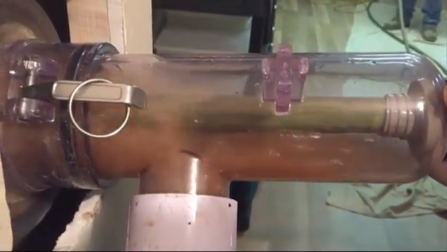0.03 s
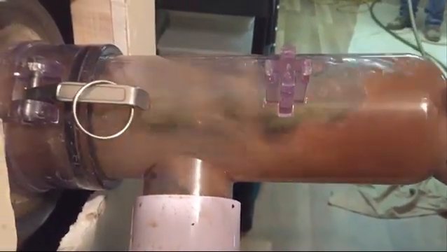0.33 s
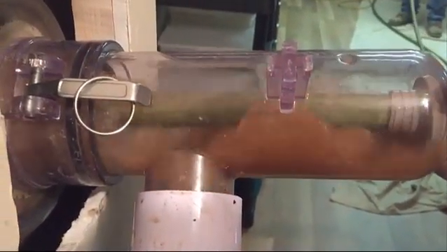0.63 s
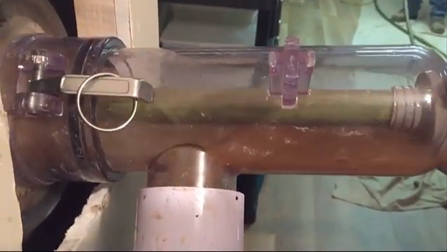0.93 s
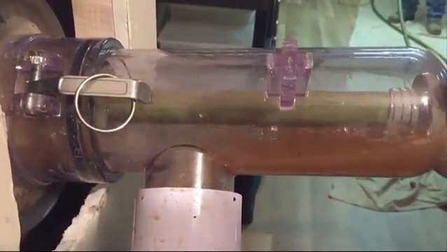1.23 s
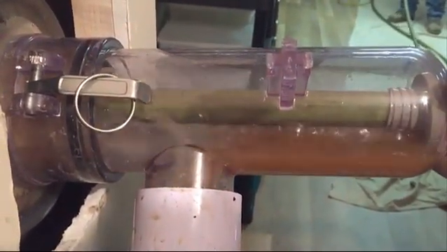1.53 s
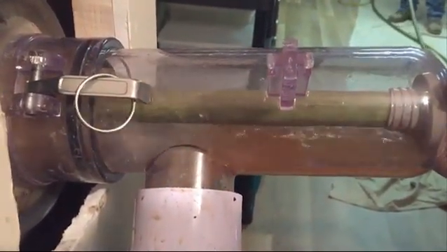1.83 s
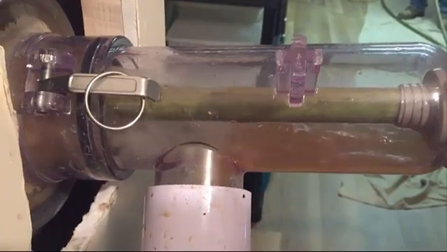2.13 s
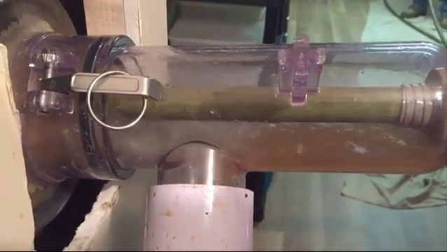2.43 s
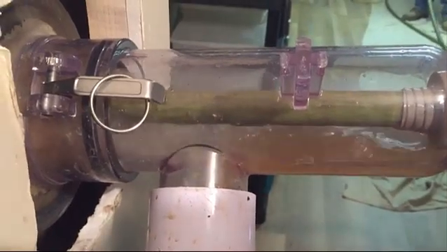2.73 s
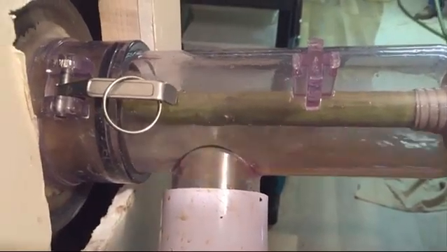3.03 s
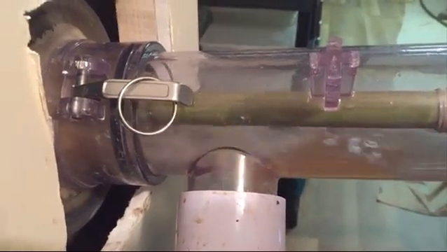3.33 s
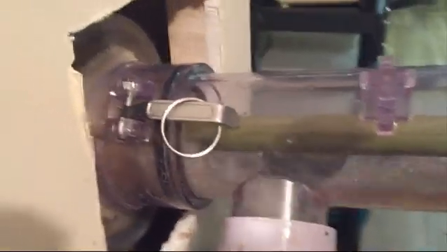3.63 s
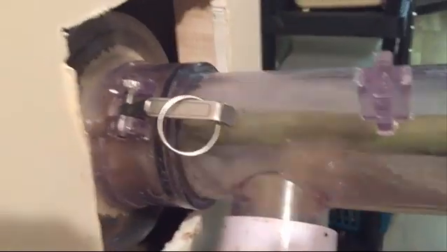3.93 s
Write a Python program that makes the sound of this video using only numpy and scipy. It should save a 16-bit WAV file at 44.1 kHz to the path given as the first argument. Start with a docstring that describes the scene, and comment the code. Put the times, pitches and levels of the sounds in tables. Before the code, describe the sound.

A high-pressure water jet roars continuously inside a plastic drain pipe, heard close. It splutters several times in the first half second, and a few drops tick on the wall until about 1.2 seconds. From 0.7 seconds the hiss brightens, with brief splutters near 1.7 and 3.5 seconds. Water churns and a pump hums faintly underneath. From 3.6 seconds the jet turns softer and duller.

```python
"""A high-pressure water jet roars inside a drain pipe, close to a clear plastic tee in a basement.
Its turbulence rings the pipe; it splutters while muddy water backs up and hisses brighter as the tee
drains. Drops tick on the wall, return water churns below and a pump hums underneath.
Near the end the microphone moves aside and the sound turns softer and duller."""
import sys
import numpy as np
from scipy import signal
from scipy.fft import rfft, irfft
from scipy.io import wavfile

SR = 44100
rng = np.random.default_rng(int(sys.argv[2]) if len(sys.argv) > 2 else 0)


def master(y):
    """Save y as 16-bit WAV."""
    cut = np.clip(np.atleast_2d(y).T, -1, 1)
    pcm = np.round(cut * 32767)  # scale
    wavfile.write(sys.argv[1], SR, pcm.astype(np.int16))


N = 176400
T, HZ = np.arange(N) / SR, np.fft.rfftfreq(N, 1 / SR)

# fader ride of the jet (t/s, level/dB)
JET_RIDE = [(0, -1), (.25, -1.5), (.55, -1), (.75, 0), (2.9, 0.14), (3.47, -0.7), (3.52, -3), (3.6, -1),
            (3.65, -4), (3.7, -4.5), (3.81, -1.5), (4, -3.5)]
# resonances of pipe and tee (f/Hz, width/Hz, relative level/dB)
PIPE_MODES = [(892, 60, -12), (1026, 50, -10.5), (1227, 136, -7), (1431, 45, -6), (1528, 51, -4),
              (1662, 114, -3), (1748.5, 87, -3), (1858, 139, -3.5), (2210, 124, -5), (2576, 220, -2),
              (2742, 82, .5), (2910, 190, -5), (3163, 168, -0.2), (3330, 125, -2.5), (3452, 90, 0.5),
              (3840, 300, -10.5), (4513, 360, -8.5)]
# ride of the pipe's mids as water backs up (t/s, level/dB)
BACKUP_RIDE = [(0, 3), (.3, 2), (.55, -0.74), (3.55, 1.13), (4, -3)]
# EQ of the jet's broad rush (f/Hz, relative level/dB)
RUSH_EQ = [(300, -31), (700, -17), (1100, -11), (1700, -2), (3300, -1), (4200, -3), (6000, -8.5),
           (8000, -21.5), (16000, -46)]
# ride of the spray's fizz and tiny drops (t/s, level/dB)
SPRAY_RIDE = [(0, -7), (.2, -6.5), (.35, -3), (.55, -3.5), (.7, -1.5), (1.7, 1), (3.3, -0.5), (3.61, -4),
              (3.66, -7), (3.82, -5), (4, -7)]
# resonances of the plastic shell (f/Hz, width/Hz, relative level/dB)
SHELL_MODES = [(5274, 310, 2), (5540, 220, 2.5), (6125, 460, -3), (6680, 410, -9), (7330, 180, -13.5),
               (8360, 870, -15), (9000, 300, -19.5), (9750, 470, -22)]
# ride of the shell's ring, damped while the tee is flooded (t/s, level/dB)
SHELL_RIDE = [(0, -5.5), (.5, -5), (.7, -2), (1.4, 0), (3.05, 0.5), (3.4, 0.2), (3.61, -0.5), (3.67, -8),
              (3.82, -6), (4, -9)]
# EQ of the finest mist (f/Hz, relative level/dB)
FIZZ_EQ = [(1500, -19), (4000, 7), (7000, 0), (9000, -3.5), (10500, -11), (11700, -6), (14000, -7.5),
           (15700, -14)]
# ride of the churning return water (t/s, level/dB)
CHURN_RIDE = [(0, 4), (.2, 4), (.3, 1), (.55, -1), (1.3, -1), (1.42, 1), (2.5, 0), (3.2, -1), (3.68, -2.5),
              (3.85, 1.5)]
# EQ of that churn (f/Hz, relative level/dB)
CHURN_EQ = [(25, -43), (42, -29), (80, -19), (170, -8), (290, 0.5), (450, 1), (540, -1), (900, 1.5),
            (1300, 0), (2500, -15.5), (8000, -45)]
# the pump's low hum (f/Hz, width/Hz, level/dB)
HUM_TONES = [(59.8, 0.8, -76.5), (70, 7.1, -70), (109.7, 6.8, -65), (135, 12, -63)]
# the motor's drone above it (f/Hz, width/Hz, level/dB before the ride)
MOTOR_TONES = [(224.6, 18, -54), (241.7, 8, -61.5), (411.4, 31, -58), (654, 10, -59.5)]
# ride of that drone (t/s, level/dB)
MOTOR_RIDE = [(0, 0.5), (.35, 2), (.55, -3), (1, 1.5), (1.45, 0), (1.8, 3.5), (2.15, -0.5), (2.5, 4),
              (3, 0.5), (3.4, -1.5), (4, -8.5)]
# two rumbles, a faint hum, a gurgle and a thin high ring (t/s, length/s, f/Hz, width/Hz, level/dB)
PASSING_RINGS = [(.05, 0.35, 121, 29, -55.5), (3.55, 0.42, 68, 19, -63), (0, .34, 655, 10, -50),
                 (0.697, 0.062, 670, 24, -47), (0.16, .85, 4470, 90, -44)]
# single drops flung at the wall (t/s, level/dB)
TICK_CUES = [(0.045, -36), (.077, -38), (.486, -39), (.931, -33), (1.206, -38)]
# EQ of a drop striking plastic (f/Hz, relative level/dB)
TICK_EQ = [(1000, -47), (4000, -7), (6000, 9), (9000, -0.5), (10500, -11), (14000, -9), (16000, -11)]
# slugs of water hit by the jet (t/s, length/s, level/dB)
SLUG_CUES = [(0.115, .022, -23.5), (0.139, 0.08, -27.5), (0.284, 0.043, -26.5), (0.437, 0.048, -31),
             (1.194, 0.022, -36), (1.723, 0.041, -32.5), (3.538, 0.06, -29)]
# EQ of a bursting slug, on top of the pipe's resonances (f/Hz, relative level/dB)
SLUG_EQ = [(300, -3), (1000, -4), (1270, 10), (1700, 4.5), (2000, 7), (2400, 0), (2800, 4.5), (5000, -14.5)]
# EQ of the plainer, duller hiss off to the side (f/Hz, relative level/dB)
ASIDE_EQ = [(2000, -29), (3600, 3), (4600, 7), (5000, -3), (5800, -18), (6900, -8), (12000, -42)]

# layer trims, ahead of the rides
PIPE_DB, RUSH_DB, SHELL_DB, FIZZ_DB, DROPS_DB = -28, -37.5, -36.5, -46, -51.5
CHURN_DB, ASIDE_DB = -44, -36
SPRAY_DROPS_PER_S, SLUG_DROPS_PER_S, TICK_S = 1500, 6000, .004
ROOM_DB, ROOM_T60_S = -6.5, .11
MOVE_START_S, MOVE_LENGTH_S = 3.57, .12
HIGH_CUT_HZ = 15680


def amp(db):
    """Decibels to gain."""
    return 10 ** (np.asarray(db) / 20)


def unit(x):
    """Scales to rms 1."""
    return x / np.sqrt(np.mean(x ** 2) + 1e-20)


def ride(points):
    """Gain over time from (t/s, level/dB) points."""
    return amp(np.interp(T, *np.transpose(points)))


def eq(points):
    """Gain over frequency from (f/Hz, level/dB) points."""
    hz, db = np.transpose(points)
    return amp(np.interp(np.log(HZ + 1), np.log(hz), db))


def peak(hz, width):
    """Response of a steep-sided resonance."""
    return 1 / (1 + 1j * (HZ - hz) / (width * np.pi / 4)) ** 2


def body(modes):
    """Gain over frequency of a set of resonances, summed in power."""
    return np.sqrt(sum(abs(amp(db) * peak(hz, width)) ** 2 for hz, width, db in modes))


def noise(response):
    """Turbulence through a filter, rms 1."""
    return unit(irfft(rfft(rng.standard_normal(N)) * response, N))


def tone(hz, width, db):
    """A wavering tone: narrow noise, softly limited to steady its level."""
    band = signal.hilbert(noise(peak(hz, width)))
    return amp(db) * unit(band.real / (abs(band) + 1))


def flutter(db, top_hz):
    """Random gain wobble, db rms deep, rolling off above top_hz."""
    return amp(db * noise(HZ / (HZ + 9) / (1 + (HZ / top_hz) ** 2)))


def throb(db, hz, width):
    """Uneven tremolo around one rate, db rms deep."""
    return amp(db * noise(peak(hz, width)))


def swell(start, length):
    """An arch that rises a little faster than it falls."""
    return np.sin(np.pi * np.clip((T - start) / length, 0, 1) ** .78)


def wander(ring):
    """Lets a resonance drift up and down as the water sloshes."""
    shift_hz = 6.99 * noise(peak(hz=2.99, width=2.99))
    return (signal.hilbert(ring) * np.exp(2j * np.pi * np.cumsum(shift_hz) / SR)).real


def patter(per_s, response, spread_db):
    """Random drop impacts, a few of them large, each ringing a filter; rms 1."""
    sizes = amp(spread_db * np.minimum(rng.exponential(1, N), 5)) * rng.choice([-1, 1], N)
    hits = sizes * (rng.random(N) < per_s / SR)
    # minimum phase keeps the attacks crisp
    cepstrum = irfft(np.log(response + 1e-5), N)
    cepstrum[1:N // 2] *= 2
    cepstrum[N // 2 + 1:] = 0
    return unit(irfft(rfft(hits) * np.exp(rfft(cepstrum)), N))


def jet():
    """Turbulence rings the pipe: lows follow the churn, mids throb and grow as water backs up."""
    rings = [(hz, amp(db) * np.sqrt(width) * wander(noise(peak(hz, width))))
             for hz, width, db in PIPE_MODES]
    low_gain = ride(CHURN_RIDE) ** .5
    mid_gain = throb(db=.78, hz=36, width=18) * ride(BACKUP_RIDE)
    pipe = sum(ring * (low_gain if hz < 1100 else mid_gain if hz < 2000 else 1) for hz, ring in rings)
    rush = amp(RUSH_DB) * noise(eq(RUSH_EQ))
    whistle = tone(hz=1748, width=34, db=-39.5) * mid_gain  # sits on one of the pipe's resonances
    return (amp(PIPE_DB) * unit(pipe) + whistle + rush) * ride(JET_RIDE) * flutter(db=.58, top_hz=35)


def spray():
    """Mist rings the plastic shell, with fine fizz and tiny drops on top."""
    shell = amp(SHELL_DB) * noise(body(SHELL_MODES)) * ride(SHELL_RIDE)
    drops = amp(DROPS_DB) * patter(SPRAY_DROPS_PER_S, eq(TICK_EQ), spread_db=3.6)
    fizz = amp(FIZZ_DB) * noise(eq(FIZZ_EQ))
    return (shell + (fizz + drops) * ride(SPRAY_RIDE)) * flutter(db=.73, top_hz=35)


def return_water():
    """Lumpy low churn of water falling into the drain."""
    return amp(CHURN_DB) * noise(eq(CHURN_EQ)) * ride(CHURN_RIDE) * flutter(db=1.15, top_hz=25)


def pump():
    """A swaying low hum under a rough motor drone that throbs, swells and sinks."""
    hum = sum(tone(*row) for row in HUM_TONES) * flutter(db=2, top_hz=5.5)
    drone_gain = ride(MOTOR_RIDE) * throb(db=1.8, hz=9.1, width=9.1)
    return hum + drone_gain * sum(tone(*row) for row in MOTOR_TONES)


def passing_rings():
    """Resonances that come and go as the tee floods and drains, and a rumble near the end."""
    return sum(swell(start, length) * tone(hz, width, db)
               for start, length, hz, width, db in PASSING_RINGS)


def ticks():
    """Large drops snap on the wall, each a tiny bright burst."""
    envelope = sum(amp(db) * swell(start, TICK_S) for start, db in TICK_CUES)
    return envelope * noise(eq(TICK_EQ))


def splutters():
    """Each slug of water bursts into drops that knock on the pipe's resonances."""
    knocks = patter(SLUG_DROPS_PER_S, body(PIPE_MODES) * eq(SLUG_EQ), spread_db=1.8)
    envelope = sum(amp(db) * swell(start, length) for start, length, db in SLUG_CUES)
    return envelope * knocks


def basement(x):
    """Adds a short diffuse tail from the walls."""
    t = T[:SR // 2]
    tail = rng.standard_normal(len(t)) * amp(-60 * t / ROOM_T60_S) * (t > .006)  # 6 ms pre-delay
    return x + amp(ROOM_DB) * signal.fftconvolve(x, tail / np.linalg.norm(tail))[:N]


def side_hiss():
    """The jet's plainer hiss fades in as the microphone moves off to the side."""
    fade_in = np.clip((T - MOVE_START_S) / MOVE_LENGTH_S, 0, 1)
    return amp(ASIDE_DB) * fade_in * ride(JET_RIDE) * noise(eq(ASIDE_EQ))


def scene():
    """Mono mix: a dry bed of water and pump, with room on the splutters and ticks only."""
    bed = jet() + spray() + return_water() + passing_rings() + pump()
    hits = basement(splutters() + ticks())
    return (bed + hits + side_hiss())[None]


def record(dry):
    """A steep high cut on the master."""
    high_cut = signal.firwin(801, HIGH_CUT_HZ, window=("kaiser", 9), fs=SR)
    return signal.oaconvolve(dry, high_cut[None], "same")


dry = scene()
out = record(dry)
master(out)
```